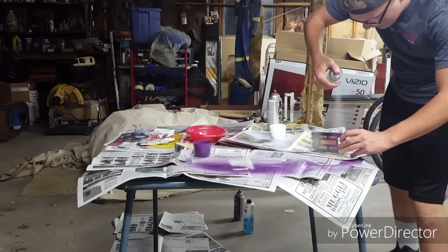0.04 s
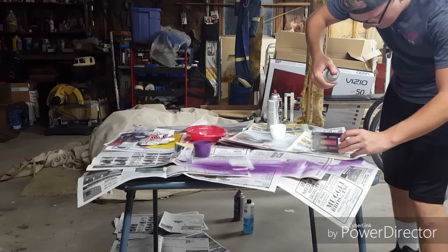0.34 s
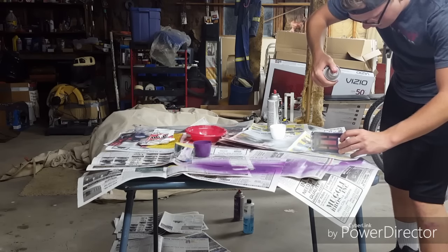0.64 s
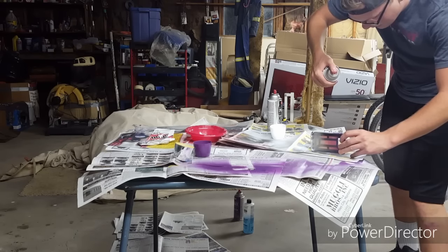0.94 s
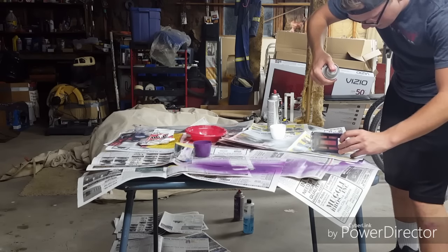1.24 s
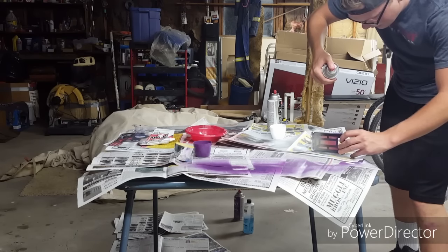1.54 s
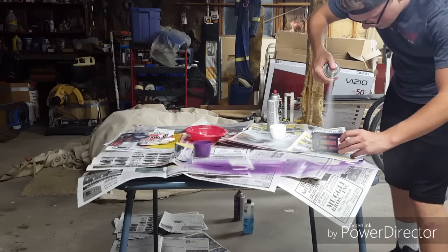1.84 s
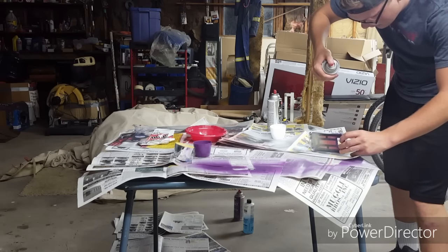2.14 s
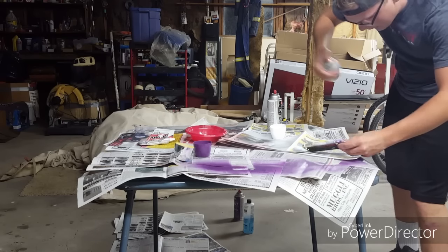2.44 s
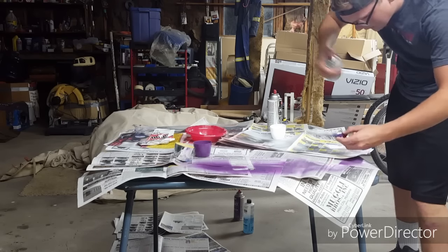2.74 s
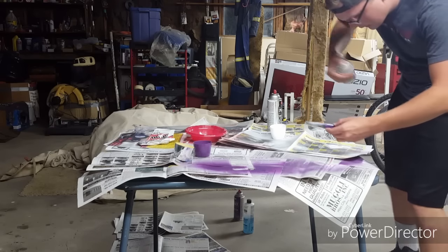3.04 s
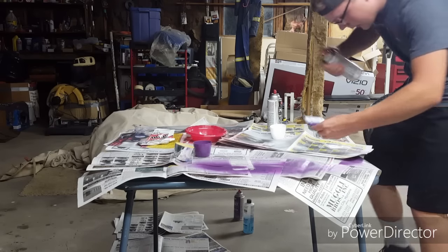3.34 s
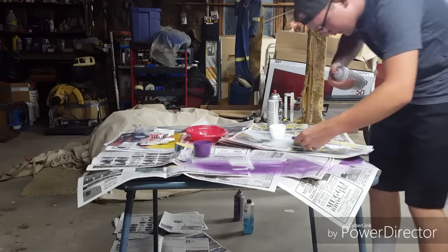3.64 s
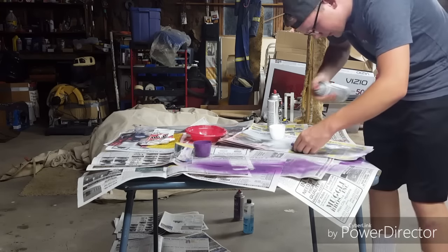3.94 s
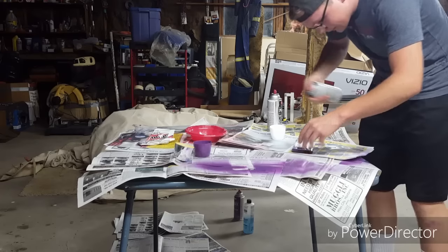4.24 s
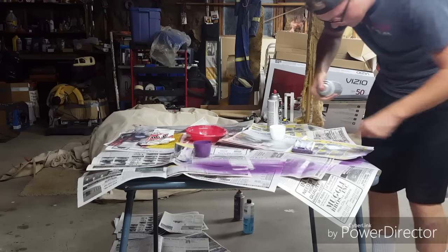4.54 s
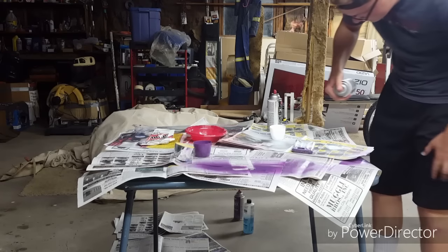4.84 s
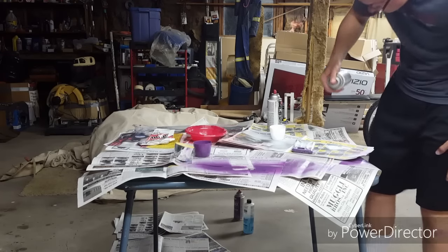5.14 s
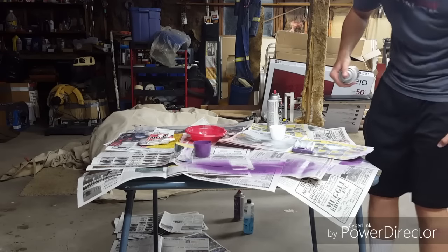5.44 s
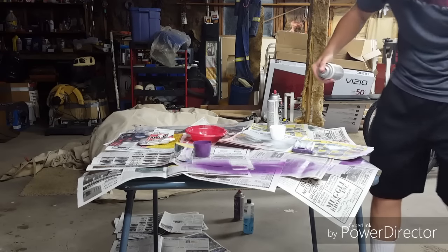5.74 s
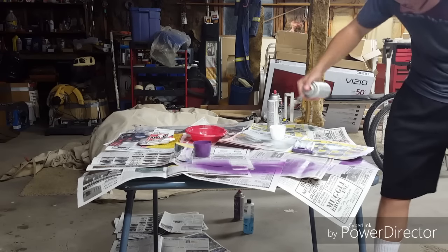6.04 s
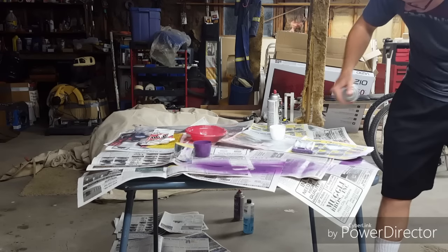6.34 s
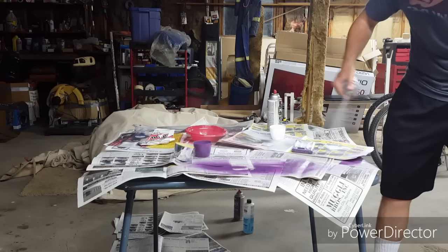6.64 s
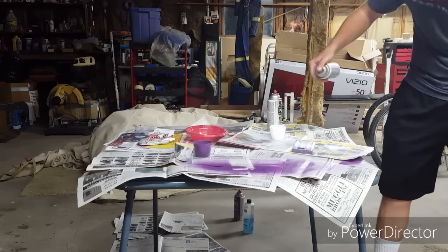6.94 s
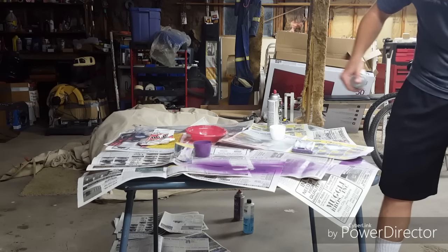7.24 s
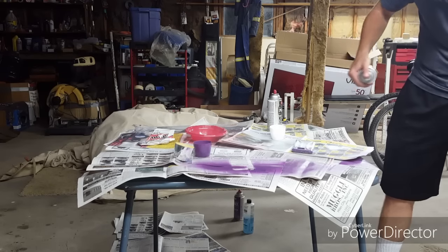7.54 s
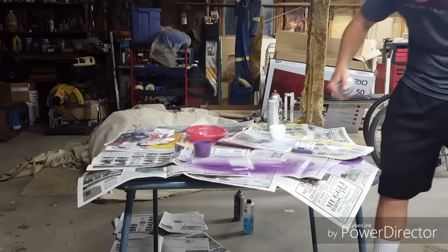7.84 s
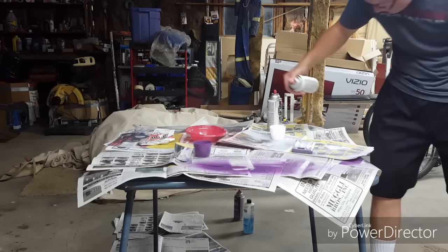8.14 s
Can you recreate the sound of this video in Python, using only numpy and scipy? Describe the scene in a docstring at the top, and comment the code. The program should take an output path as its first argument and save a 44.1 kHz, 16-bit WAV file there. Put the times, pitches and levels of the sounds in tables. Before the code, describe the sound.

Short hisses of a spray paint can, then its ball rattling as it is shaken, then more spraying in a garage.

```python
"""A garage, at a newspaper-covered table: an aerosol can gives four short squirts, the nozzle hissing
and the jet rushing against a hollow workpiece, while a fingertip ticks the cap. The can is shaken and
its mixing ball knocks inside as the workpiece slides over the paper and bumps the table. A shoe scuffs
twice on the concrete, then come four longer sweeps of paint. A fan hums under it all."""
import sys
import numpy as np
from scipy import signal
from scipy.fft import rfft, irfft, next_fast_len
from scipy.io import wavfile

SR = 44100
rng = np.random.default_rng(int(sys.argv[2]) if len(sys.argv) > 2 else 0)


def bounce(signal):
    """Save signal as a 16-bit WAV file at the path given by the first command-line argument."""
    frames = np.transpose(np.atleast_2d(signal))
    limited = np.clip(frames, -1, 1)
    pcm = np.round(limited * 32767).astype(np.int16)
    wavfile.write(sys.argv[1], SR, pcm)


N = 370440
TIME = np.arange(N) / SR

# reverb tail of the garage: (frequency [Hz], t60 [s])
ROOM_DECAY = [(150, 0.15), (500, 0.29), (1500, 0.4), (4000, 0.35), (9000, 0.29), (15000, 0.16)]
# the two microphone ports colour the sound differently: (frequency [Hz], left minus right [dB])
PORT_BALANCE = [(500, -1.5), (1500, -1), (2400, 1.5), (3200, 2), (4200, 6.5), (5400, 3), (6500, 2.5),
                (8300, 3.5), (9600, 0.5), (10700, -7.5), (12500, -4), (15000, -8.5)]
# fan motor and mains tones: (frequency [Hz], level [dB])
HUM_TONES = [(50, -86.5), (58.6, -68.5), (99.9, -68), (119.8, -65.5), (149.5, -72), (161.3, -65),
             (200, -84), (249, -74), (352, -78)]
# room modes that the fan's air excites: (frequency [Hz], width [Hz], gain [dB])
ROOM_MODES = [(53.6, 4.7, -5), (151, 9.1, -1), (164.1, 7.5, 4.5), (170, 20, -27.5), (192.5, 4.04, 5.5),
              (230.4, 17.6, -6), (293.6, 11.2, -10.5), (307.2, 7.8, 1), (379.6, 15.3, -2), (394, 5.2, -4.5),
              (493, 26, -18)]
# soft wash of the fan: (frequency [Hz], gain [dB])
AIR_COLOUR = [(20, -15), (80, -7), (130, 6), (250, 2.5), (420, -4.5), (600, -11), (1000, -14.5),
              (2000, -21), (4000, -25.5), (7000, -32.5), (10000, -32), (15000, -29.5)]
# valve presses, each a pass of the jet across the workpiece: (open [s], shut [s], on target [s],
# fall of the rush off target [dB/s], nozzle hiss [dB], table rush [dB], hollow ring [dB])
VALVE_PRESSES = [(0.065, 0.172, .165, 96, -44, -42.5, -40.5), (0.598, 0.728, 0.673, 35, -45, -45.5, -44),
                 (1.419, 1.531, 1.48, 40, -45, -43.5, -44.5), (1.902, 2.021, 1.91, 45, -45, -44, -44),
                 (6.152, 6.362, 6.29, 40, -45.5, -41.5, -45.5), (6.736, 6.931, 6.795, 65, -44, -40.5, -62),
                 (7.206, 7.367, 7.22, 68, -47, -46.5, -56), (7.986, 8.15, 7.995, 123, -45, -46.5, -72)]
# bright hiss of the nozzle: (frequency [Hz], gain [dB])
NOZZLE_COLOUR = [(500, -20), (1500, -9), (3000, -4), (5000, -1.5), (7300, -1.5), (8500, -2), (9500, -2),
                 (11000, 1.5), (13000, -1), (15500, -6.5)]
# the jet landing on the table: (frequency [Hz], gain [dB])
RUSH_COLOUR = [(400, -18.5), (750, -14), (1100, -11), (1800, -6.5), (2600, -1), (3700, 1), (4500, 1),
               (5400, 3), (6000, 0.5), (6900, -16), (9000, -49), (15000, -32)]
# hollow of the workpiece: (frequency [Hz], width [Hz], gain [dB])
CAVITY_MODES = [(1360, 660, -9.5), (2390, 200, 0), (3160, 250, 0.5), (3720, 560, -8), (4650, 650, -2)]
# fingertip on the spray cap: (time [s], level [dB])
FINGER_TICKS = [(0.415, -52), (0.535, -60)]
# ping of the metal under the cap: (frequency [Hz], gain [dB], t60 [s])
PING_MODES = [(2369, -6, 0.059), (3677, -2.5, 0.071), (6325, -27, .1), (7235, -19, .1)]
# hard attack of cap and ball: (frequency [Hz], gain [dB])
CRACK_COLOUR = [(300, -13), (700, -42), (2000, 9.5), (4000, 9.5), (5200, -3.5), (6400, 6.5), (7500, -0.5),
                (9300, -3.5), (11000, 0.5), (13000, -4.5), (16000, -26)]
# ball hits: (time [s], pitch of the paint-loaded wall [Hz], wall [dB], rim [dB], crack [dB])
BALL_KNOCKS = [(2.535, 2310, -40.5, -37.5, -37), (2.588, 2100, -60, -59, -43.5),
               (2.642, 1850, -52.5, -68, -51), (2.685, 1560, -50, -68, -58),
               (2.789, 2240, -39.5, -54.5, -46), (2.972, 2170, -38.5, -36.5, -39),
               (3.087, 1620, -47, -58, -55), (3.175, 2190, -44, -55.5, -57),
               (3.343, 2290, -38, -40.5, -41.5), (3.417, 2280, -41, -47, -34),
               (3.421, 2150, -37.5, -67, -43), (3.538, 1530, -38.5, -48, -42),
               (3.592, 1560, -35, -40, -38.5), (3.606, 2330, -36, -52, -47), (3.739, 1610, -36, -43.5, -42),
               (3.817, 1670, -38.5, -42.5, -46), (3.829, 2200, -50, -43.5, -40.5),
               (3.956, 1510, -37.5, -43.5, -41.5), (3.988, 2150, -59, -46.5, -71),
               (4.103, 2170, -36, -51, -44), (4.146, 2450, -53, -62, -51.5),
               (4.222, 1520, -39.5, -50.5, -52), (4.376, 1700, -42, -35, -44.5),
               (4.497, 1480, -40.5, -73, -46.5), (4.639, 1900, -45.5, -53, -51),
               (4.794, 1480, -47.5, -79.5, -58.5), (4.97, 1160, -44.5, -72, -57),
               (5.456, 1210, -47.5, -77, -60)]
# wall of the can, damped by hand and paint: (frequency [Hz], gain [dB], t60 [s])
CAN_WALL_MODES = [(700, -15, 0.016), (880, -5.5, 0.034), (1155, 0, 0.012), (1390, -2.5, 0.026),
                  (1530, 0, 0.027), (1740, -5, 0.023), (1930, 2, 0.007), (2168, 2.5, 0.017),
                  (2360, -2.5, 0.034)]
# rim of the can: (frequency [Hz], width [Hz], gain [dB])
CAN_RIM_MODES = [(875, 180, -10), (1770, 520, -8.5), (2390, 980, -3), (3294, 550, 0), (3860, 430, 6),
                 (4010, 1140, 0)]
# slides over newspaper and swishes of clothing: (peak [s], rise [s], fall [s], level [dB])
PAPER_SLIDES = [(3.32, 0.2, .25, -55), (3.597, 0.094, 0.094, -42), (3.74, .2, 0.35, -61),
                (4.56, 0.58, .3, -59.5), (5.01, 0.11, 0.14, -62.5), (5.29, 0.25, 0.9, -68.5)]
# rustle of newspaper: (frequency [Hz], gain [dB])
RUSTLE_COLOUR = [(120, 6), (220, 7), (450, 5), (1000, 2.5), (2200, 6.5), (4000, 6), (7000, -0.5),
                 (10000, -3), (15000, -13)]
# the workpiece bumps the table: (time [s], level [dB])
TABLE_BUMPS = [(3.644, -45), (3.741, -44.5), (3.829, -50.5), (4.104, -54)]
# body of the table: (frequency [Hz], gain [dB], t60 [s])
THUD_MODES = [(150.5, -8.5, 0.26), (217, 1, 0.085), (340, -15, 0.094), (560, -7, 0.052)]
# a sole drags over concrete: (peak [s], rise [s], fall [s], level [dB])
SOLE_DRAGS = [(5.385, 0.036, 0.027, -58.5), (5.612, 0.022, 0.081, -49), (5.675, 0.074, 0.065, -43),
              (5.865, 0.054, 0.19, -54)]
# grit under the sole: (frequency [Hz], gain [dB])
GRIT_COLOUR = [(450, -2), (1100, -3.5), (2000, -4), (3300, 1.5), (4600, -3), (6300, -7), (8000, -13),
               (11000, -13), (15000, -21)]
# the sole comes down: (time [s], slap [dB], hollow ring [dB])
SOLE_LANDINGS = [(5.692, -66, -52), (5.837, -42, -40)]
# slap of the sole: (frequency [Hz], gain [dB])
LANDING_COLOUR = [(450, -1), (900, -11), (1800, 0.5), (3200, 1.5), (5000, -3.5), (8000, -6), (11000, -8.5),
                  (13500, -7), (15500, -18)]
# hollow ring under the sole: (frequency [Hz], width [Hz], gain [dB])
LANDING_MODES = [(943, 31, 12), (1480, 80, 0.5), (1850, 280, -15)]


def from_db(db):
    """Decibels to gain."""
    return 10 ** (np.asarray(db) / 20)


def rms_one(x):
    """Scale to an rms of 1."""
    return x / np.sqrt(np.mean(x ** 2) + 1e-20)


def at_hz(points, hz):
    """Read a curve on a log-frequency axis."""
    f, value = np.transpose(points)
    return np.interp(np.log(np.maximum(hz, 1)), np.log(f), value)


def coloured(x, curve):
    """EQ a steady sound, rolling off below the curve's first point; rms 1."""
    hz = np.fft.rfftfreq(N, 1 / SR)
    low_cut = np.minimum(hz / curve[0][0], 1) ** 2
    return rms_one(irfft(rfft(x) * from_db(at_hz(curve, hz)) * low_cut, N))


def resonant(x, modes):
    """Play a steady sound through a bank of resonators; rms 1."""
    out = 0
    for k, (hz, width, db) in enumerate(modes):
        r = np.exp(-np.pi * width / SR)
        feedback = [1, -2 * r * np.cos(2 * np.pi * hz / SR), r * r]
        out += (-1) ** k * from_db(db) * signal.lfilter([1 - r, 0, r - 1], feedback, x)
    return rms_one(out)


def drift(per_s):
    """A random wander; rms 1."""
    knots = rng.standard_normal(N // 16)
    return rms_one(np.interp(TIME * per_s, np.arange(len(knots)), knots))


def grains(per_s, spread_db):
    """Random clicks of uneven size; rms 1."""
    sizes = from_db(spread_db * np.minimum(rng.exponential(1, N), 4)) * rng.standard_normal(N)
    return rms_one(sizes * (rng.random(N) < per_s / SR))


def struck(modes, t, scatter_db, detune=0):
    """Modes ring out after a hit; the timbre varies by chance, the overall level holds."""
    out, power = 0, 0
    for hz, db, t60 in modes:
        fade = from_db(db - 60 * t / t60)
        share = rng.choice([-1, 1]) * from_db(scatter_db * rng.normal())
        pitch = hz * (1 + detune * rng.normal())
        out += share * fade * np.sin(2 * np.pi * pitch * t)
        power += np.mean(fade ** 2) / 2
    return rms_one(out) * np.sqrt(power)


def burst(sound, t60, t):
    """Cut a decaying transient of set strength from a steady sound."""
    fade = from_db(-60 * t / t60)
    return rms_one(sound[:len(t)] * fade) * np.sqrt(np.mean(fade ** 2))


def gate(t, on, off, open_s, shut_s):
    """Envelope that opens smoothly, holds, then shuts."""
    return (1 + np.tanh((t - on) / (2 * open_s))) * (1 - np.tanh((t - off) / (2 * shut_s))) / 4


def swells(strokes):
    """Envelope of strokes that add in power; each rise and fall spans 20 dB."""
    t, power = TIME[::32], 0
    for peak, rise, fall, db in strokes:
        distance = np.maximum((peak - t) / rise, (t - peak) / fall)
        power += from_db(db - 20 * np.minimum(distance, 10)) ** 2
    return np.interp(TIME, t, np.sqrt(power))


def around(on, off, margin_s=.04):
    """The samples of a press, with a handle on either side."""
    return slice(round((on - margin_s) * SR), round((off + margin_s) * SR))


def add(track, s, sound):
    """Mix a sound into a track at a time."""
    i = round(s * SR)
    track[..., i:i + sound.shape[-1]] += sound[..., :N - i]


def garage(x, near_db, wet_db, lag_ms=0.13, near_t60=0.053, build_s=0.0025):
    """One spot in the room: direct sound, right side first, then scatter off clutter and a tail."""
    t = TIME[:SR // 3]
    hz = np.fft.rfftfreq(len(t), 1 / SR)
    white, tail = rfft(rng.standard_normal((2, len(t)))), 0
    alike = np.sinc(hz / 2000)   # the ports are close together, so they share the lows
    white[1] = alike * white[0] + np.sqrt(1 - alike ** 2) * white[1]
    for centre, t60 in ROOM_DECAY:
        band = at_hz([(f, f == centre) for f, _ in ROOM_DECAY], hz)
        tail += irfft(white * band, len(t)) * from_db(-60 * t / t60)
    tail = rms_one(tail * (1 - np.exp(-t / build_s)))
    near = rms_one(irfft(white, len(t))[:, ::-1] * from_db(-60 * t / near_t60) * (t > .001))
    echoes = (from_db(near_db) * near + from_db(wet_db) * tail) / np.sqrt(len(t))
    size = next_fast_len(len(x) + len(t), True)
    hz = np.fft.rfftfreq(size, 1 / SR)
    direct = np.exp(-2j * np.pi * hz * np.array([[lag_ms / 1000], [0]]))
    ports = from_db(at_hz(PORT_BALANCE, hz) * np.array([[.5], [-.5]]))
    return irfft(rfft(x, size) * (direct + rfft(echoes, size)) * ports, size)[:, :-SR // 20]


def fan(drone_db=-57, air_db=-60, drone_side_db=-14, waver_db=2):
    """The bed: motor and mains hum, air droning in the room modes, and a wash with wide treble."""
    sides, hum = np.array([[1], [-1]]), 0
    for hz, db in HUM_TONES:
        level = np.sqrt(2) * from_db(db + waver_db * drift(per_s=4))
        hum += level * np.sin(2 * np.pi * (hz * TIME + rng.random()))
    mid, side = rng.standard_normal((2, N))
    drone = from_db(drone_db) * resonant(mid + from_db(drone_side_db) * sides * side, ROOM_MODES)
    mid, side = rng.standard_normal((2, N))
    side = signal.sosfilt(signal.butter(1, 650, "high", fs=SR, output="sos"), side)
    air = from_db(air_db) * coloured(mid + sides * side, AIR_COLOUR)
    return (hum + drone + air) * from_db(-.4 * sides)   # leans slightly right


def spray(hiss_db=-3.5, rush_db=-7, hollow_db=-5, droplet_db=-3, spit_db=2, spit_s=.012):
    """The nozzle hisses; jet and droplets rush against table and workpiece, loudest on target."""
    impact = rng.standard_normal(N) + from_db(droplet_db) * grains(per_s=2000, spread_db=2.5)
    jet = from_db(hiss_db) * coloured(rng.standard_normal(N), NOZZLE_COLOUR)
    table = from_db(rush_db) * coloured(impact, RUSH_COLOUR)
    cavity = from_db(hollow_db) * resonant(rng.standard_normal(N), CAVITY_MODES)
    out = np.zeros(N)
    for on, off, on_target, fall, hiss, rush, hollow in VALVE_PRESSES:
        now = around(on, off)
        t = TIME[now]
        miss_db = fall * np.abs(t - on_target)
        accent_db = spit_db * np.exp(-np.maximum(t - on, 0) / spit_s)   # spits as the valve opens
        nozzle = from_db(hiss + accent_db - 0.23 * miss_db) * jet[now]   # dips less off target
        surfaces = from_db(rush - miss_db) * table[now] + from_db(hollow - miss_db) * cavity[now]
        out[now] = gate(t, on, off, open_s=0.0037, shut_s=0.00079) * (nozzle + surfaces)
    return out


def sweeps(sound):
    """The can is held somewhere else for every press, so the room colours each one anew."""
    out = np.zeros((2, N))
    for on, off, *_ in VALVE_PRESSES:
        now = around(on, off)
        add(out, now.start / SR, garage(sound[now], near_db=3.5, wet_db=0))
    return out


def spray_cap(click_db=7, click_t60=0.014, ping_db=-1):
    """A fingertip clicks the cap and the metal under it pings."""
    out, t = np.zeros((2, N)), TIME[:SR // 4]
    crackle = coloured(rng.standard_normal(N), CRACK_COLOUR)
    click = crackle[:len(t)] * from_db(click_db - 60 * t / click_t60)
    for s, db in FINGER_TICKS:
        ping = from_db(ping_db) * struck(PING_MODES, t, scatter_db=0)
        add(out, s, garage(from_db(db) * (click + ping), near_db=3, wet_db=0))
    return out


def mixing_ball(rim_db=11, crack_db=7.5, focus_db_per_octave=-8):
    """Each knock beams out a crack and a snap of the rim; a duller ring of the wall fills the room."""
    out, t = np.zeros((2, N)), TIME[:SR // 10]
    crackle = coloured(rng.standard_normal(N), CRACK_COLOUR)
    clack = resonant(rng.standard_normal(N), CAN_RIM_MODES)
    for s, loaded_hz, wall, rim, crack in BALL_KNOCKS:
        start = round(s * SR)
        snap = from_db(crack + crack_db) * burst(crackle[start:], t60=0.012, t=t)
        snap += from_db(rim + rim_db) * burst(clack[start:], t60=0.0076, t=t)
        # the wall rings most near the pitch that the sloshing paint allows
        modes = [(hz, db + focus_db_per_octave * abs(np.log2(hz / loaded_hz)), t60)
                 for hz, db, t60 in CAN_WALL_MODES]
        ring = from_db(wall) * struck(modes, t, scatter_db=1, detune=.05)
        delay_s = rng.uniform(0.0091, .04)
        add(out, s, garage(rebounding(snap, delay_s), near_db=-3, wet_db=-3.5))
        add(out, s, garage(rebounding(ring, delay_s), near_db=-2, wet_db=1.5))
    return out


def rebounding(knock, delay_s, loss_db=17):
    """The ball touches again, softer: a flam on the knock."""
    second_touch = np.pad(knock, (round(delay_s * SR), 0))[:len(knock)]
    return knock + from_db(-loss_db) * second_touch


def newspaper(stir_db=-66.5):
    """Paper and clothing rustle as the workpiece is picked up and slid along."""
    stir = from_db(stir_db) * gate(TIME, on=2.58, off=4.7, open_s=0.014, shut_s=0.014)
    rustle = coloured(grains(per_s=4000, spread_db=3), RUSTLE_COLOUR)
    return np.hypot(stir, swells(PAPER_SLIDES)) * rustle


def table_top(bump_db=-2.5):
    """The workpiece bumps the table, which answers with a low thud."""
    out = np.zeros(N)
    for s, db in TABLE_BUMPS:
        add(out, s, from_db(db + bump_db) * struck(THUD_MODES, TIME[:SR // 2], scatter_db=2))
    return garage(out, near_db=-0.5, wet_db=3.5)[:, :N]


def shoe(rise_s=0.017, slap_fall_s=0.089, ring_fall_s=0.051):
    """Grit grinds under a dragged sole, which slaps down with a hollow ring."""
    slap = swells([(s, rise_s, slap_fall_s, db) for s, db, _ in SOLE_LANDINGS])
    hollow = swells([(s, rise_s, ring_fall_s, db) for s, _, db in SOLE_LANDINGS])
    scuff = swells(SOLE_DRAGS) * coloured(grains(per_s=4500, spread_db=3), GRIT_COLOUR)
    puff = rng.standard_normal(N)
    return scuff + slap * coloured(puff, LANDING_COLOUR) + hollow * resonant(puff, LANDING_MODES)


def broad(source, spots=2):
    """A broad source sounds from unrelated spots, which share its power."""
    return sum(source()[:, :N] for _ in range(spots)) / np.sqrt(spots)


def scene(sputter_db=1.5):
    """The mix: paint cone, paper and sole play broad, with the hits and the fan bed added."""
    sputter = from_db(sputter_db * drift(per_s=130))   # paint passes the valve in uneven slugs
    paint = from_db(-2.56) * broad(lambda: sweeps(spray() * sputter))
    paper = from_db(-6) * broad(lambda: garage(newspaper(), near_db=4.5, wet_db=1))
    steps = from_db(-4.5) * broad(lambda: garage(shoe(), near_db=5.5, wet_db=-1))
    return paint + paper + steps + spray_cap() + mixing_ball() + table_top() + fan()


def record(dry, whine_db=-84, whine_hz=10400, whine_width_hz=190, cutoff_hz=15500):
    """A faint, narrow hiss sits in the right channel; a steep low-pass takes off the top."""
    whine = from_db(whine_db) * resonant(rng.standard_normal(N), [(whine_hz, whine_width_hz, 0)])
    low_pass = signal.ellip(10, .1, 80, cutoff_hz, fs=SR, output="sos")
    return signal.sosfilt(low_pass, dry + whine * np.array([[0], [1]]))


dry = scene()
out = record(dry)
bounce(out)
```